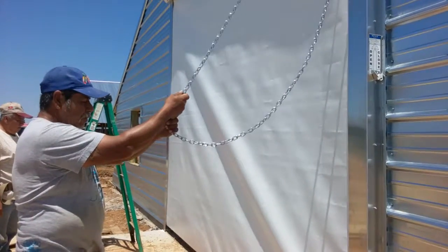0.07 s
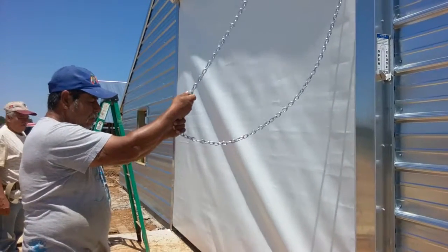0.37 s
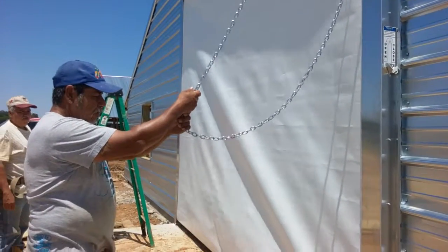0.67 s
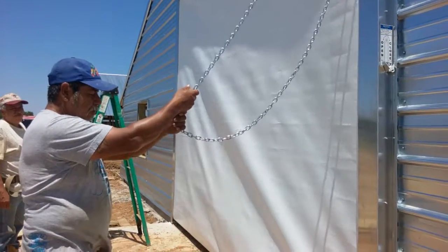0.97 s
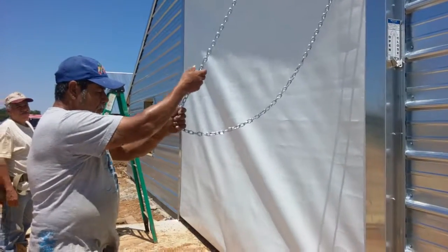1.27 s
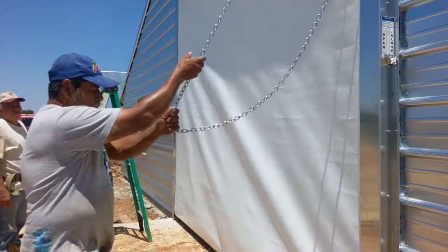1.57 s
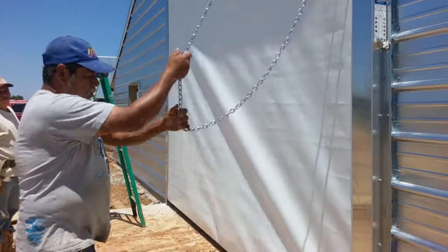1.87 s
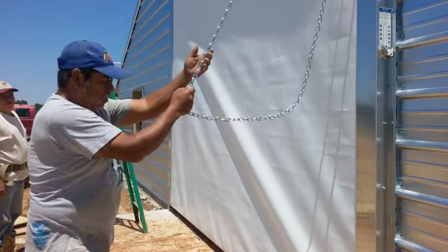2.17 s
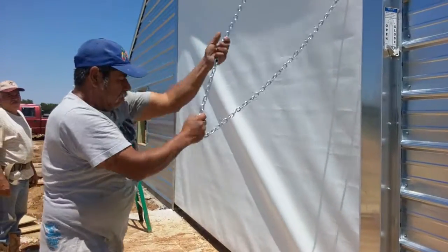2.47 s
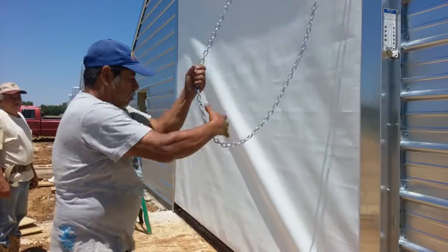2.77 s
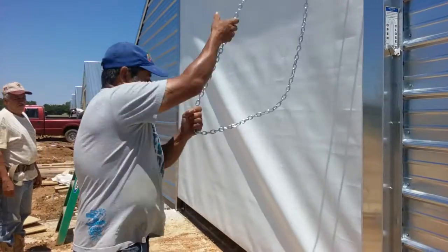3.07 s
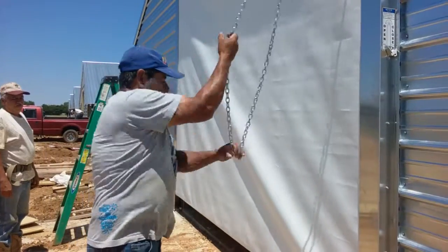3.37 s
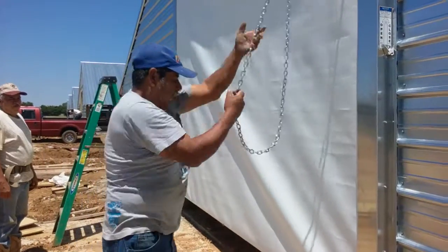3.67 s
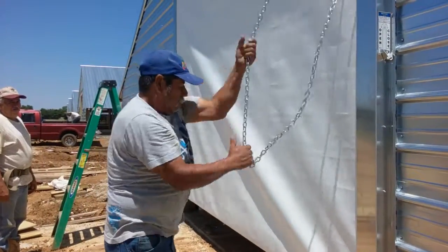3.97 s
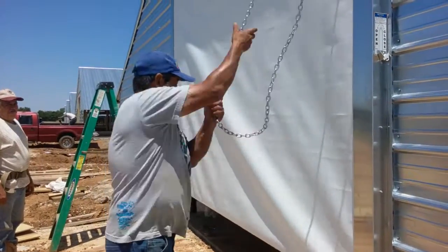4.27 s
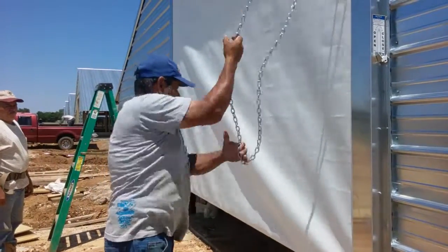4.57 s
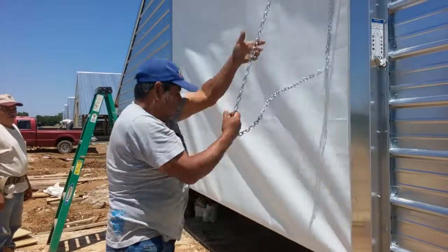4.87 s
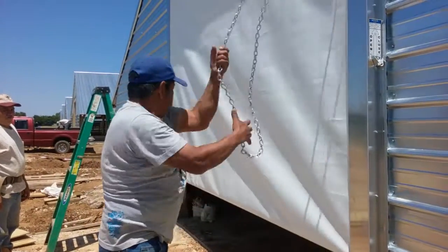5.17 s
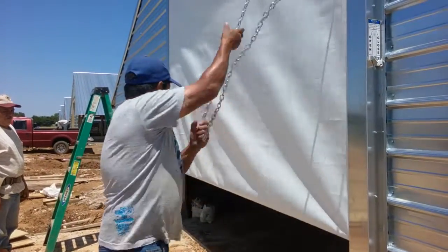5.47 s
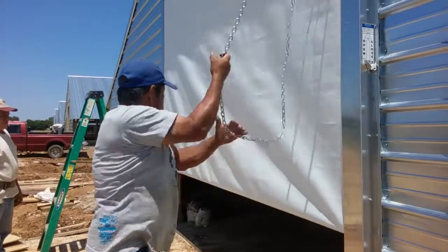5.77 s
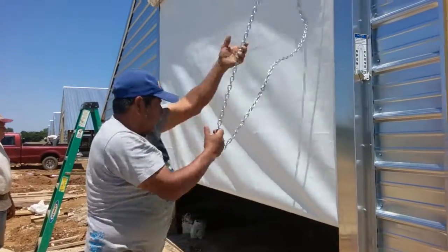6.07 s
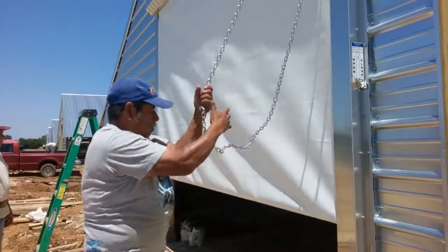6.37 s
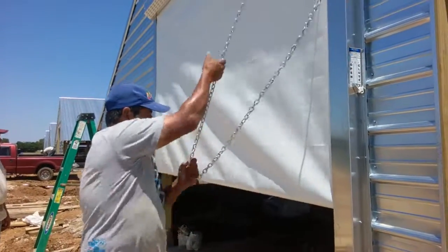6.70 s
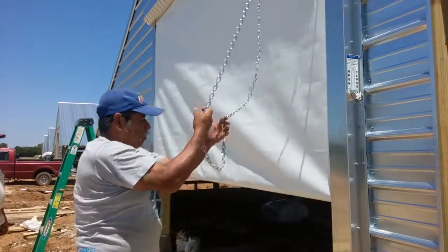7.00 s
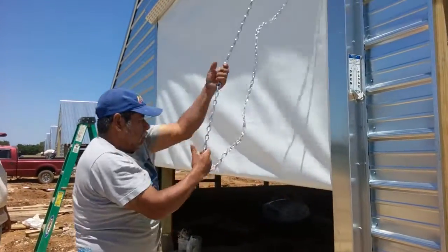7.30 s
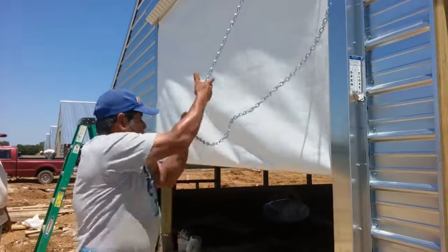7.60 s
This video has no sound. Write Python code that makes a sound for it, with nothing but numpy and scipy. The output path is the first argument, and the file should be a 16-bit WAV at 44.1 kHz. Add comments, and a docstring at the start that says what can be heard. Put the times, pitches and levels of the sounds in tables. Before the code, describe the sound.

A hand-pulled chain hoist clicks, then rattles in repeated surges as a roll-up door rises, with wind buffeting the microphone.

```python
"""A roll-up door is hauled open with a chain hoist, outdoors beside a sheet-metal wall.
From the start gusts buffet the microphone; the chain is inched along, single links click over the
wheel, the gear knocks and the door frame rings. Near 1.7 s the chain slides through a hand.
From 2 s ten pulls follow hand over hand, and with speed clicks and knocks merge into a rattle.
The chain chatters on its guide at 3.8 s, slaps the door track at 5.8 s and chatters again at 7.3 s."""
import sys
import numpy as np
from scipy import signal
from scipy.fft import rfft, irfft
from scipy.io import wavfile
from scipy.ndimage import uniform_filter1d

SR = 44100
rng = np.random.default_rng(int(sys.argv[2]) if len(sys.argv) > 2 else 0)


def master_out(mix):
    """Clip the mix to full scale and print it as 16-bit PCM to the path in sys.argv[1]."""
    frames = np.transpose(np.atleast_2d(mix))
    ceiling = np.clip(frames, -1, 1)
    pcm = np.round(ceiling * 32767).astype(np.int16)
    wavfile.write(sys.argv[1], SR, pcm)


N = 341334
T = np.arange(N) / SR

# arm pulls: (start [s], length [s], speed at grab, midway, at release [links/s],
#             link level [dB], rattle level [dB], hardest moment [0-1])
PULLS = [(1.977, .51, 8, 10.6, 8.6, -13, -22.5, 0.57), (2.562, .768, 7.8, 14.5, 15.6, -14.5, -16, 0.71),
         (3.358, .682, 8.8, 20.5, 21, -17, -15, 0.46), (4.085, .515, 16.2, 32, 19.4, -21, -17.5, 0.53),
         (4.645, .5, 13.3, 31, 6, -15.5, -16, 0.66), (5.216, .524, 21.2, 25, 17.8, -16, -14.5, 0.32),
         (5.812, .448, 17, 19, 21.5, -22, -19, 0.079), (6.379, .471, 15.9, 26.5, 9.6, -19.5, -19.5, 0.41),
         (6.902, .518, 20.4, 19.5, 9.2, -19, -18.5, 0.55), (7.497, .46, 13, 34, 12.5, -15.5, -15.5, 0.26)]


def amp(db):
    """Decibels to gain."""
    return 10 ** (np.asarray(db) / 20)


def unit(x):
    """Scale to rms 1."""
    return x / np.sqrt(np.mean(x ** 2))


def curve(rows):
    """Join (time [s], value) rows by straight lines."""
    return np.interp(T, *np.transpose(rows))


def colour(x, points, size=2048):
    """Causal unit-energy filter shaped by (frequency [Hz], level [dB]) rows."""
    hz, db = np.transpose(points)
    bins_hz = np.maximum(np.arange(size // 2 + 1) * SR / size, 1)
    gain = amp(np.interp(np.log(bins_hz), np.log(hz), db))
    cepstrum = irfft(np.log(gain))
    cepstrum[1:size // 2] *= 2  # fold to minimum phase
    cepstrum[size // 2 + 1:] = 0
    response = irfft(np.exp(rfft(cepstrum)))
    return signal.oaconvolve(x, response / np.linalg.norm(response))[:len(x)]


def fade(t, t60_s):
    """Decay by 60 dB in t60_s."""
    return np.exp(-np.log(1000) * t / t60_s)


def impulses(times_s, sizes):
    """One impulse per contact."""
    return np.bincount(np.abs(times_s * SR).astype(int), sizes, N)[:N]


def blows(times_s, sizes, crack_t60_s, tail_t60_s, tail_db, grain_db=5, count=7):
    """Blows on several contact points, each with its own crack and ragged steel tail."""
    t = T[:SR // 4]
    knots_s = t[::100]
    grain = amp(grain_db * np.interp(t, knots_s, rng.standard_normal(len(knots_s))))
    noise = rng.standard_normal((count, len(t)))
    out = 0
    for k in range(count):
        tail = unit(np.roll(grain, rng.integers(len(t)))) * amp(tail_db) * fade(t, tail_t60_s)
        response = noise[k] * (fade(t, crack_t60_s) + tail)
        out = out + signal.oaconvolve(impulses(times_s[k::count], sizes[k::count]), response)[:N]
    return out


def pings(times_s, sizes, pitches_hz, t60_s):
    """A short damped ring per contact."""
    t = T[:SR // 20]
    envelope = fade(t, t60_s) * (1 - fade(t, .002))
    out = np.zeros(N + len(t))
    for start, size, hz in zip(np.clip(times_s * SR, 0, N).astype(int), sizes, pitches_hz):
        out[start:start + len(t)] += size * envelope * np.sin(2 * np.pi * hz * t)
    return out[:N]


def echoes(x, db, t60_s=.35, count=60):
    """Add scattered early reflections from the ribbed wall and the door drum."""
    delay_s = rng.uniform(.0028, .09, count)
    taps = impulses(delay_s, rng.standard_normal(count) * fade(delay_s, t60_s))[:SR // 10]
    return x + amp(db) * signal.oaconvolve(x, taps / np.linalg.norm(taps))[:N]


def air():
    """Faint open-air background."""
    # (frequency [Hz], level [dB])
    spectrum = [(40, 7), (110, 24), (650, -14), (1200, 0), (3100, -7), (5000, -28.5), (15000, -17)]
    return amp(-38) * unit(colour(rng.standard_normal(N), spectrum))


def wind():
    """Eddies are carried past the microphone: faster air is louder and higher."""
    # steady flow: (time [s], level [dB])
    breeze = [(0, -25), (.7, -28), (.86, -43), (1.4, -41), (1.9, -31), (2.7, -29), (4.3, -31), (4.55, -35),
              (4.8, -30), (6.0, -26), (6.8, -31.5), (7.73, -30)]
    # buffets: (start [s], length [s], level [dB])
    gusts = [(0, .15, -19.5), (0.243, 0.094, -15.5), (0.412, 0.24, -13.5), (0.949, 0.054, -29),
             (1.103, 0.093, -31.5), (1.523, 0.059, -22.5), (2.09, 0.076, -14), (2.202, 0.28, -14),
             (2.598, .14, -25), (3.253, .2, -18.5), (3.56, 0.3, -18.5), (3.921, 0.19, -16.5),
             (4.232, .1, -22), (4.669, 0.096, -24), (4.959, .16, -22), (5.321, .24, -18),
             (5.609, 0.15, -13), (5.859, .22, -16.5), (6.301, .12, -20.5), (6.504, .21, -17),
             (6.89, 0.073, -21), (7.017, 0.19, -15), (7.227, 0.088, -22), (7.511, 0.0716, -25)]
    # single eddies: (time [s], level [dB])
    eddies = [(0.022, -15.5), (.097, -13.5), (0.473, -9), (0.518, -14.5), (0.568, -15), (0.637, -16.5),
              (2.385, -16.5), (3.361, -17.5), (3.79, -16.5), (3.972, -14.5), (4.0, -15.5), (5.377, -16.5),
              (5.505, -16), (5.682, -16.5), (6.003, -16), (6.145, -11.5), (6.191, -12.5), (6.311, -11.5),
              (6.346, -16), (6.528, -16.5), (6.635, -16.5), (7.052, -13), (7.099, -13.5)]
    # turbulence: (frequency [Hz], level [dB])
    spectrum = [(20, -8), (100, 3.5), (200, 1.5), (320, -3.5), (500, -11), (800, -22), (1400, -28.5),
                (3000, -109), (8000, -100)]
    flutter_hz, flutter_db = 30, 6.5
    flutter = unit(signal.sosfilt(signal.butter(2, flutter_hz, fs=SR, output="sos"),
                                  rng.standard_normal(N)))
    power = amp(curve(breeze)) ** 2
    for start_s, length_s, db in gusts:
        power += amp(db) ** 2 / (1 + (2 * (T - start_s) / length_s - 1) ** 8)
    gust = np.sqrt(power) * amp(flutter_db * np.tanh(.7 * flutter) - 1.48)
    eddy, whirl = np.zeros(N), np.zeros(N)
    for time_s, db in eddies:
        bump = np.exp(-np.minimum(np.abs(T - time_s) / .009, 10) ** 2)
        eddy += amp(db) * bump
        whirl += bump ** 2
    force = np.hypot(gust, eddy)
    # an eddy's fast core gives the thump its hard edge
    speed = np.clip((force / amp(-15)) ** .18 * (1 + .8 * whirl), .2, 2.5)
    field = unit(colour(rng.standard_normal(2 * N), spectrum))
    field /= np.sqrt(uniform_filter1d(field ** 2, size=1600) + 1e-9)  # force alone sets the level
    return force * np.interp(np.cumsum(speed), np.arange(2 * N), field)


def arm_slack(start_s, length_s, crest):
    """Slackness of the arm: 0 at the hardest moment, 1 at take-up and release."""
    take_up_s = .087  # the chain tightens before the first link
    squareness = 2.67  # above 2: holds longer, lets go faster
    peak_s = start_s + length_s * np.clip(crest, .05, .9)
    before = (peak_s - T) / (peak_s - start_s + take_up_s)
    after = (T - peak_s) / (start_s + length_s - peak_s)
    return np.where(T < peak_s, before, after) ** squareness


def effort(sag_db=15):
    """Force of the rattle: overlapping pulls above the jostling of the hanging chain."""
    # (time [s], level [dB])
    jostle = [(0.0, -37.5), (0.24, -44.5), (0.34, -31), (1.06, -48), (1.78, -47.5), (1.82, -27.5),
              (2.6, -32), (7.73, -32)]
    power = amp(curve(jostle)) ** 2
    for start_s, length_s, *_, db, crest in PULLS:
        slack = np.minimum(arm_slack(start_s, length_s, crest), 10)
        power += amp(db - sag_db * slack) ** 2
    return np.sqrt(power)


def rattle(hauled, count=2100):
    """Small collisions of links, guide and rollers; their force follows the pull."""
    # hoist body: (frequency [Hz], level [dB])
    clatter_spectrum = [(200, -12.5), (700, -3), (1000, -5), (1330, -12), (1900, -5.5), (2300, -3),
                        (3250, 0), (3600, -9), (4350, -5.5), (5200, -16), (6100, -19.5), (6800, -12.5),
                        (10500, -28), (15000, -36.5)]
    # loose links: (frequency [Hz], level [dB])
    jingle_spectrum = [(2000, 1.5), (4400, -46), (5800, 1), (7200, 10), (9500, 3), (11500, 0), (14300, 6),
                       (16000, -2)]
    spread_db, shake_db, shake_s = 12.5, 10.5, .038
    lateness, strength, clink_pitch, tinkle_pitch = rng.random((count, 4)).T
    times_s = (np.arange(count) + 2 * lateness) / count * T[-1]
    sizes = amp(spread_db * strength ** 2)
    pull = effort()
    clatter = blows(times_s, sizes, crack_t60_s=.014, tail_t60_s=.12, tail_db=-5)
    clatter = colour(clatter, clatter_spectrum)
    clinks = echoes(pings(times_s, sizes, 2100 + 2300 * clink_pitch ** 1.2, t60_s=.049), db=-3)
    # each hauled link briefly shakes its loose neighbours, which ring much higher
    loose_s = times_s[::2]
    lags_s = loose_s[:, None] - hauled[:, 0]
    since_link_s = np.where(lags_s > 0, lags_s, np.inf).min(axis=1)
    force = sizes[::2] * amp(shake_db * np.exp(-since_link_s / shake_s))
    tinkle = echoes(pings(loose_s, force, 15300 - 2200 * tinkle_pitch ** 1.201, t60_s=.014), db=3)
    jangle = blows(loose_s, force, crack_t60_s=.012, tail_t60_s=.1, tail_db=-6)
    jingle = amp(-14.5) * unit(colour(jangle, jingle_spectrum)) + amp(-19) * unit(tinkle)
    jingle *= (pull / amp(-13)) ** .55  # mostly on hard pulls
    return pull * (amp(-3) * unit(clatter) + amp(-6.5) * unit(clinks) + jingle)


def knocks(hauled):
    """Gear and guide knocks: a crack and a short ring, pitched by where the steel meets."""
    # separate gear and guide knocks, light while inching, louder during the pulls:
    # (time [s], level [dB], ring [Hz])
    single_knocks = [(0.0597, -17, 3150), (0.2546, -13.5, 3560), (0.2601, -14, 3130), (0.2927, -9.5, 3090),
                     (0.3334, -9, 3300), (0.4047, -12.5, 3350), (0.4124, -9.5, 3343), (0.4386, -12.5, 3480),
                     (0.477, -14.5, 3130), (0.595, -17.5, 3350), (0.632, -11.5, 3090),
                     (0.6924, -13.5, 3150), (0.8036, -14, 3420), (0.82, -10, 3220), (0.924, -20.5, 3200),
                     (1.4872, -19.5, 3430), (1.5394, -21, 3087), (1.7995, -12, 3014), (1.8692, -12, 3370),
                     (2.3643, -3, 2446), (2.593, -3, 4170), (2.7883, -4, 3010), (2.9, -6, 3040),
                     (3.5585, -6.5, 3044), (3.9146, -4.5, 3974), (4.7283, -5, 3110), (4.8631, -6.5, 4210),
                     (5.0511, -7, 4310), (6.9455, -5.5, 3324), (7.1143, -5.5, 4140), (7.4996, -9, 3245)]
    # gear crack: (frequency [Hz], level [dB])
    spectrum = [(300, -8), (900, 0.5), (1300, -1.5), (2200, 4), (3300, 1), (4400, -3), (5500, -8),
                (6800, -5), (9000, -14.5), (15000, -16)]
    # gear modes: (ratio to main ring, level [dB], t60 [s])
    modes = [(1, 0.5, 0.019), (.69, -10.5, 0.034), (1.11, -13, 0.035)]
    times_s, db, hz = np.vstack([single_knocks, gear_play(hauled), chatter()]).T
    crack = colour(blows(times_s, amp(db), crack_t60_s=.0044, tail_t60_s=.25, tail_db=-3), spectrum)
    ring = sum(pings(times_s, amp(db + mode_db), hz * ratio, t60_s) for ratio, mode_db, t60_s in modes)
    return amp(-13.5) * crack + echoes(ring, db=-7.5, t60_s=.18)


def links(hauled):
    """Each link strikes the wheel, bounces three times as it seats, and tinkles."""
    # links inched into the wheel: (time [s], level [dB])
    first_links = [(0.0606, -37), (0.2906, -23), (0.438, -17), (0.6313, -25.5), (0.845, -21.5),
                   (0.9975, -33), (1.82, -20.5)]
    # link clack: (frequency [Hz], level [dB])
    spectrum = [(400, -5.5), (1500, 10.5), (2500, -8), (4300, 17), (5500, 4.5), (7000, 6.5), (10500, 2.5),
                (12500, 2), (14300, -10), (16000, -11.5)]
    scatter_db, bounce_loss_db_per_s, slack_ring_db = 2, 120, 9
    first_pull_s = hauled[0, 0]
    strikes_s, db = np.vstack([first_links, hauled[:, :2]]).T
    db = db + scatter_db * rng.standard_normal(len(db)) * (strikes_s > first_pull_s)
    delay_s = np.cumsum(rng.uniform(.001, .005, (len(db), 3)), axis=1)
    bounces = amp(db[:, None] - bounce_loss_db_per_s * delay_s)
    times_s = np.concatenate([strikes_s, (strikes_s[:, None] + delay_s).ravel()])
    sizes = np.concatenate([amp(db), bounces.ravel()])
    clack = colour(blows(times_s, sizes, crack_t60_s=.011, tail_t60_s=.09, tail_db=-11), spectrum)
    ringing = sizes * amp(slack_ring_db * (times_s < first_pull_s))  # slack links ring more freely
    tinkle = sum(pings(times_s, ringing, rng.normal(bending_hz, 600, len(times_s)), t60_s=.012)
                 for bending_hz in (13600, 14600))
    return amp(-5) * clack + amp(-6) * echoes(tinkle, db=-6, t60_s=.08)


def frame(shake):
    """The hoist shakes the frame it is bolted to, which rings on."""
    # frame and wall panels: (frequency [Hz], level [dB], t60 [s])
    modes = [(711, -8, .16), (810, -6, .3), (967, -2, .2), (1029, -5, .2), (1513, -7, .1), (1824, -2, .08),
             (2150, -2, .05), (3130, 4, .05)]
    t = T[:SR]
    response = sum(amp(db) * fade(t, t60_s) * np.sin(2 * np.pi * hz * t) for hz, db, t60_s in modes)
    return amp(-51.5) * signal.oaconvolve(shake, response)[:N]


def slide(grit_db=7):
    """Soft gritty hiss of chain running through the palm."""
    # (time [s], level [dB])
    envelope = [(1.45, -67), (1.7, -40.5), (1.92, -39), (2.1, -63)]
    # (frequency [Hz], level [dB])
    spectrum = [(1000, -3), (5300, -5), (6600, 1), (7800, -8), (9200, -2), (11000, -12), (14000, -15)]
    grit = rng.standard_normal(N) * amp(grit_db * rng.standard_normal(N))
    return unit(colour(grit, spectrum)) * amp(curve(envelope))


def hauled_links(sag_db=2.5):
    """One wheel strike per link of chain travel: (time [s], level [dB], speed [links/s])."""
    rows = []
    for start_s, length_s, grab, midway, release, db, _, crest in PULLS:
        t = start_s + np.arange(int(length_s * SR)) / SR
        links_per_s = np.interp(t, start_s + length_s * np.linspace(0, 1, 3), [grab, midway, release])
        travel_links = np.cumsum(links_per_s) / SR
        times_s = np.interp(np.arange(int(travel_links[-1]) + 1), travel_links, t)
        slack = np.interp(times_s, T, arm_slack(start_s, length_s, crest))
        rows.append(np.column_stack([times_s, db - sag_db * slack, np.interp(times_s, t, links_per_s)]))
    rows = np.vstack(rows)
    return rows[rows[:, 0] < T[-1]]


def gear_play(hauled):
    """The gear takes up its play before a link, falls back after: (time [s], level [dB], ring [Hz])."""
    lead_s, backlash_s, rest_s = .01, .033, .13
    tooth_db, backlash_db = 8.5, 5
    ring_hz, spread_hz = 3190, 71
    softening_db_per_doubling, slow_links_per_s = 5, 9  # a running gear stays in mesh
    times_s, db, links_per_s = hauled.T
    db = db - softening_db_per_doubling * np.log2(links_per_s / slow_links_per_s)
    tooth_pitch, lateness, back_pitch = rng.standard_normal((len(db), 3)).T
    running = np.diff(times_s, prepend=-1) < rest_s  # from rest, tooth and link strike together
    tooth_s = times_s - lead_s * running
    back_s = times_s + backlash_s * (1 + .15 * lateness)
    tooth = np.column_stack([tooth_s, db + tooth_db, ring_hz + spread_hz * tooth_pitch])
    back = np.column_stack([back_s, db + backlash_db, ring_hz + spread_hz * back_pitch])
    return np.vstack([tooth, back])


def chatter(knocks_per_s=110, ring_hz=4150, spread_hz=180):
    """The chain knocks on its guide in quick uneven runs: (time [s], level [dB], ring [Hz])."""
    # (start [s], length [s], level [dB])
    runs = [(3.82, 0.089, -9), (7.334, .05, -12)]
    rows = []
    for start_s, length_s, db in runs:
        for time_s in np.arange(start_s, start_s + length_s, 1 / knocks_per_s):
            late, louder, higher = rng.standard_normal(3)
            rows.append((time_s + .0022 * late, db + 2.9 * louder, ring_hz + spread_hz * higher))
    return rows


def slap():
    """A run of slack links hits the door track almost at once."""
    # (time [s], level [dB])
    hits = [(5.8108, 2), (5.816, -5), (5.819, -1)]
    # (frequency [Hz], level [dB])
    spectrum = [(600, -19), (2300, 7.5), (4400, 4), (5300, -7), (7100, 2.5), (9000, -10), (15000, -11)]
    times_s, db = np.transpose(hits)
    impact = blows(times_s, amp(db), crack_t60_s=.024, tail_t60_s=.19, tail_db=-15)
    return amp(-5.5) * colour(impact, spectrum)


def scene():
    """Hoist, frame, hand and wind at one microphone."""
    hauled = hauled_links()
    hoist = rattle(hauled) + slap() + links(hauled) + knocks(hauled)
    return (hoist + frame(hoist) + slide() + wind() + air())[None]


def record(dry):
    """The microphone drops the deep bass, rounds the highest peaks and cuts the top."""
    bottom_hz, top_hz = 58, 15750
    thin = signal.sosfilt(signal.butter(4, bottom_hz, "highpass", fs=SR, output="sos"), dry)
    rounded = np.tanh(.72 * thin) / .7
    return signal.sosfilt(signal.ellip(10, .2, 80, top_hz, fs=SR, output="sos"), rounded)


dry = scene()
out = record(dry)
master_out(out)
```